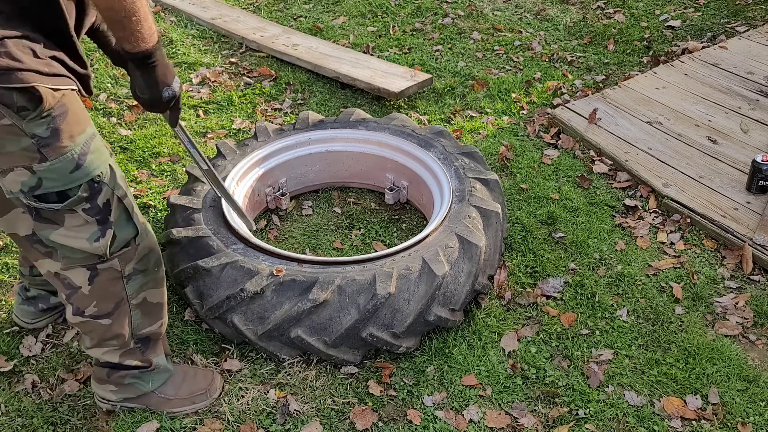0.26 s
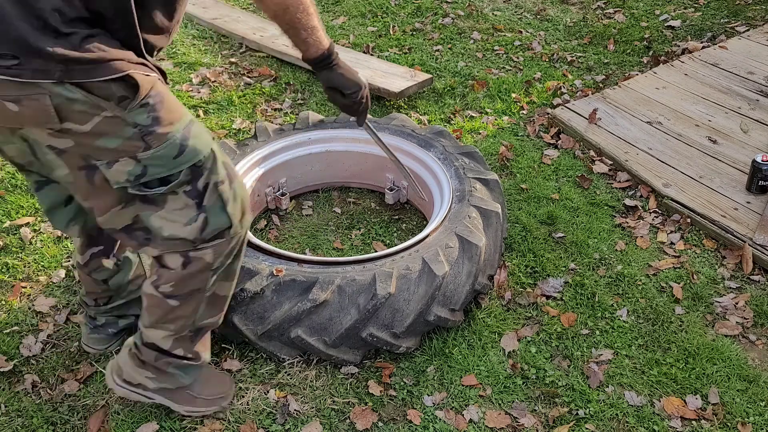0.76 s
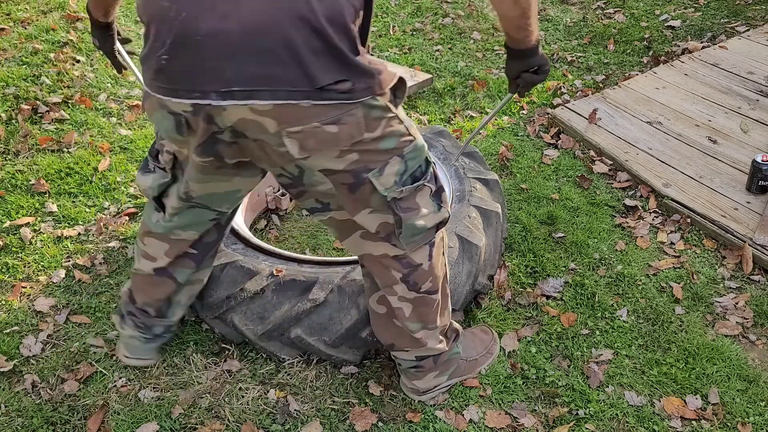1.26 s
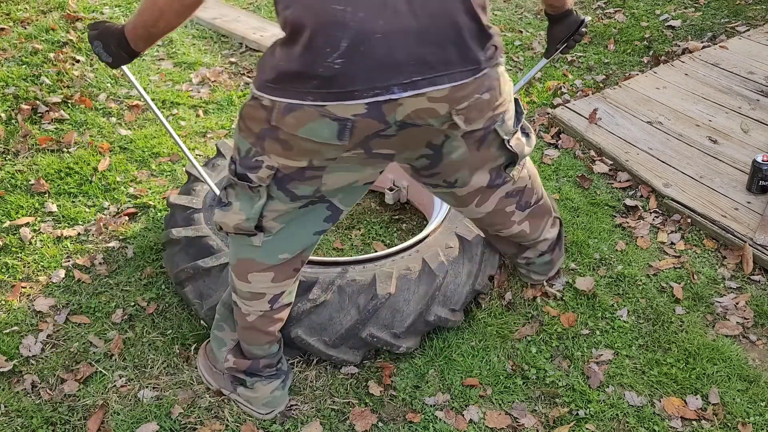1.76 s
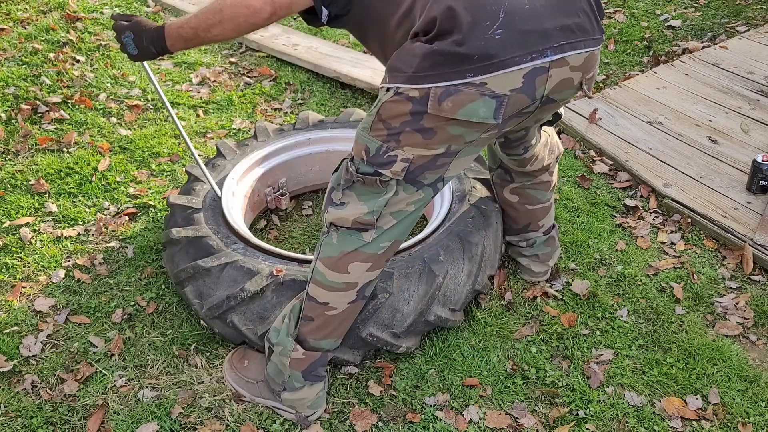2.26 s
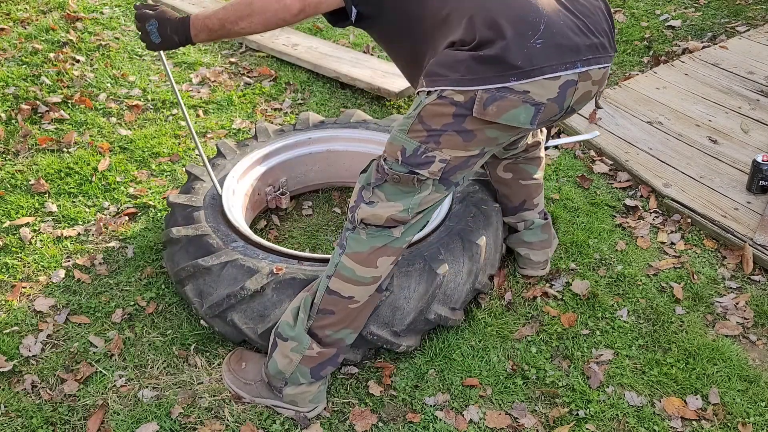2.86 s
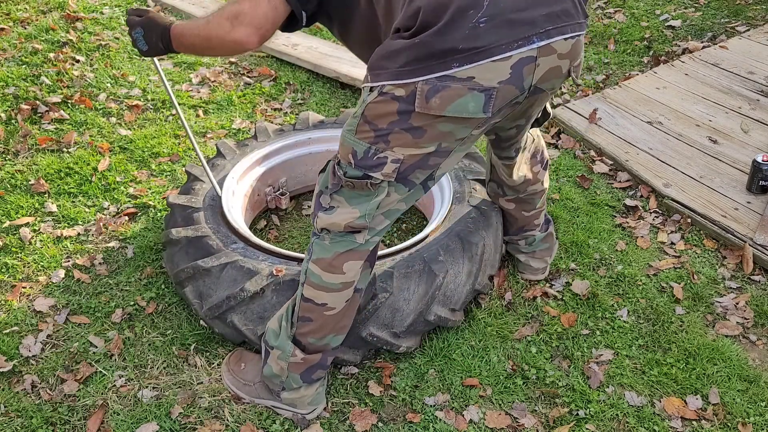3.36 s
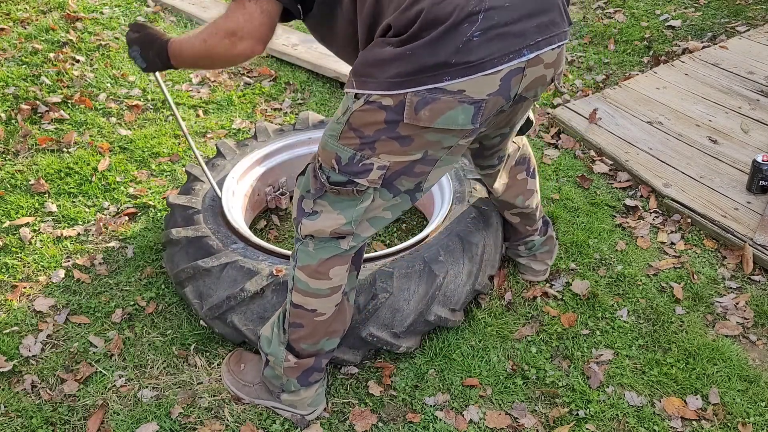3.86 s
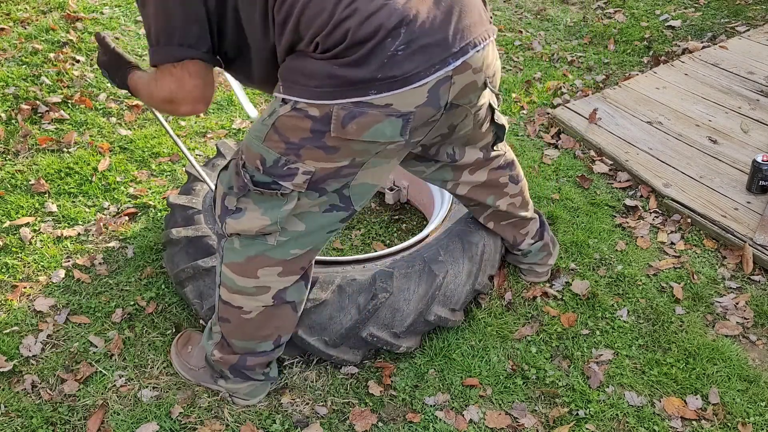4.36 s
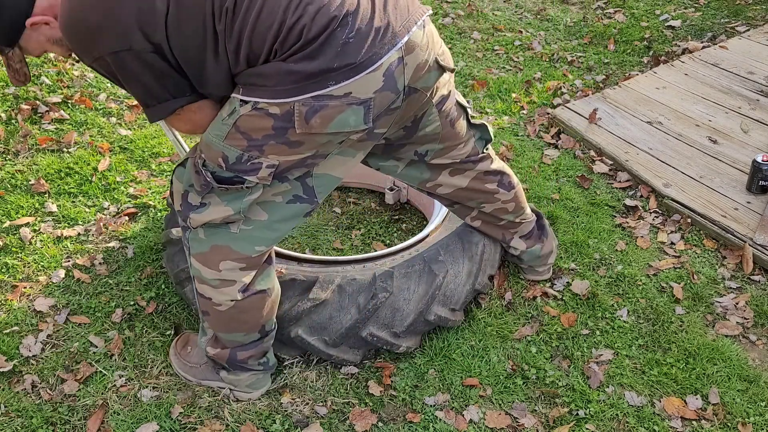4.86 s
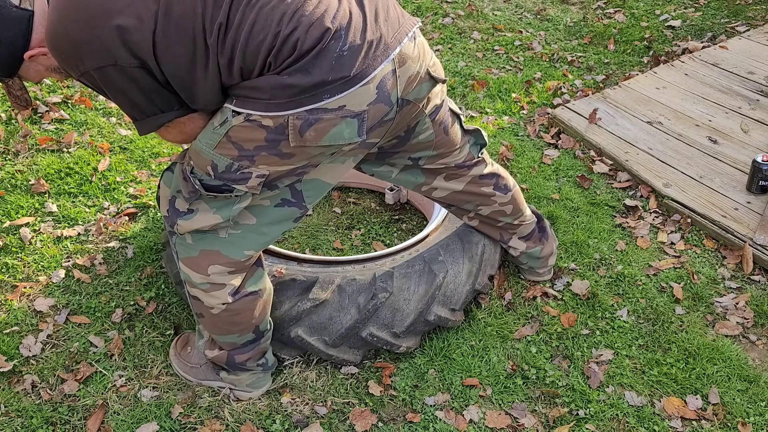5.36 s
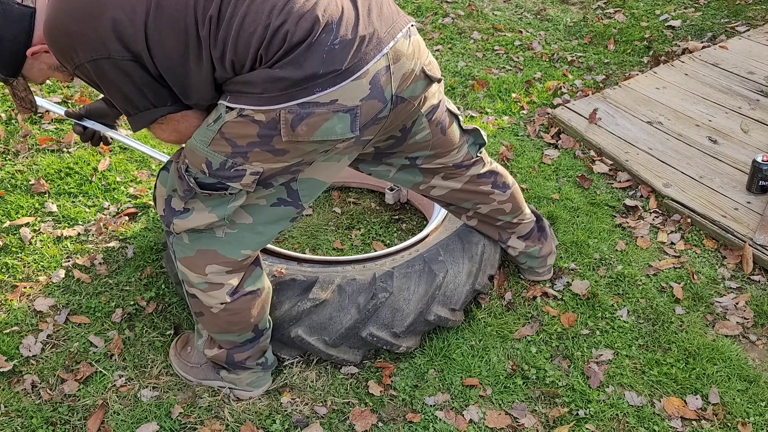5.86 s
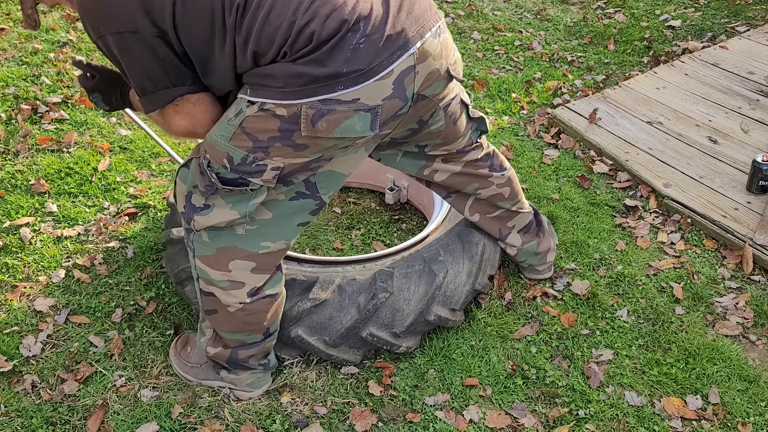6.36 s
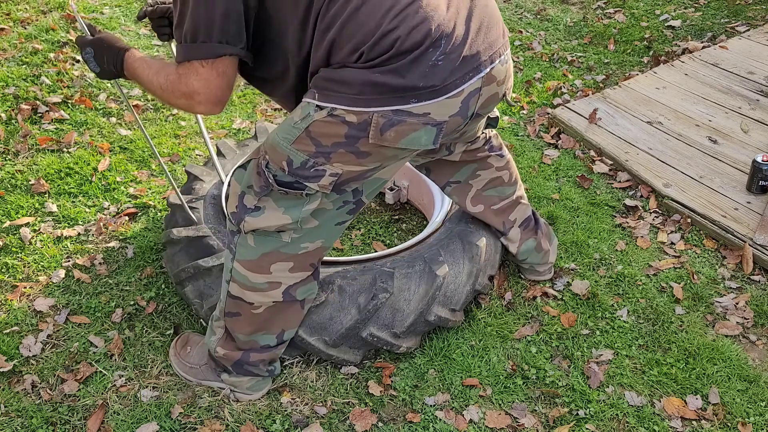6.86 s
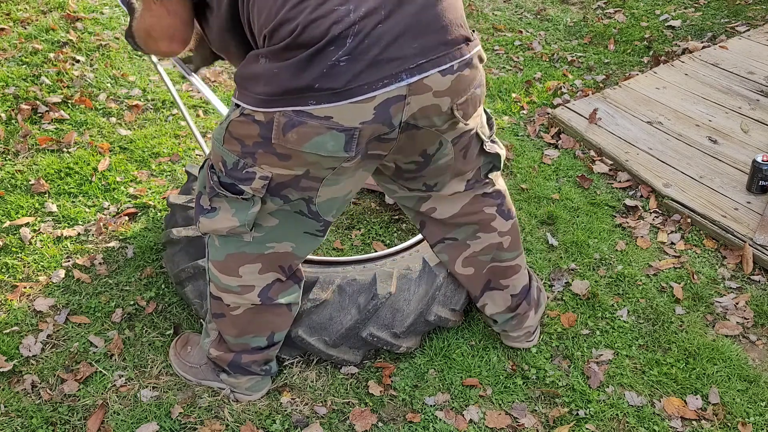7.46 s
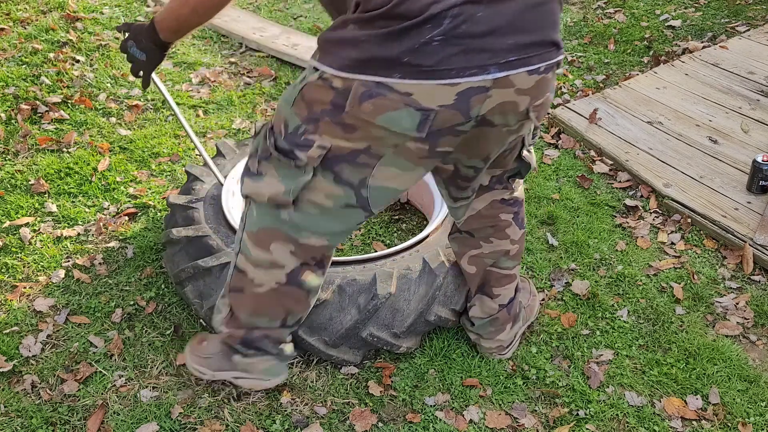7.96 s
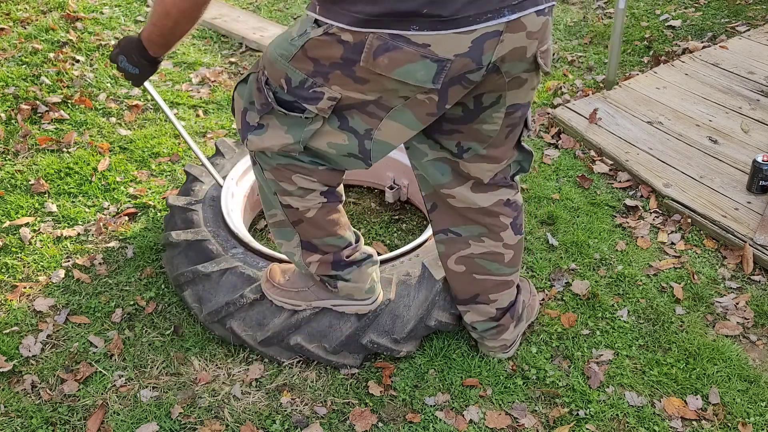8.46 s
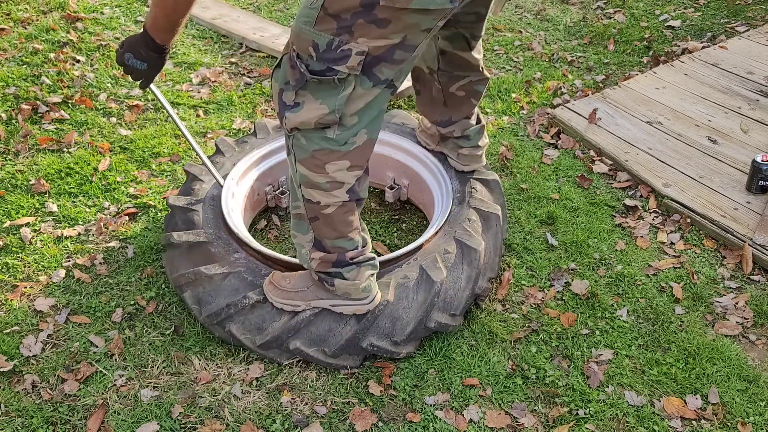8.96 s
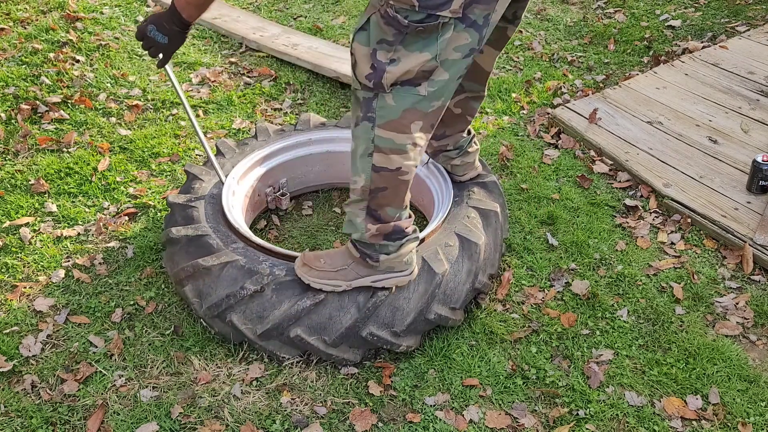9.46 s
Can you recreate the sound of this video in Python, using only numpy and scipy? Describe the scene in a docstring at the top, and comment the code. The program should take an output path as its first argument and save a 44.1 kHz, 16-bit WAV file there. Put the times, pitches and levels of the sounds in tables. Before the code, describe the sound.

Close outdoor sound of a tire being pried from a steel rim on a lawn. Grassy footsteps and snapping leaves lead to a bright clank, then light scraping and a busy burst of knocks with a loud low pop. Short damped clangs and rubbery pops continue, separated by quiet pauses. Late steps end in a booming thud and faint scuffs. A slight slapback follows, above a low, distant engine hum and faint air.

```python
"""A soft rubber pop and a thin, fading steel whine come first, then boots swishing through grass and leaves.
Two steel tire irons pry a tractor tire off its rim on a lawn: blows excite the damped modes of rim and iron,
stick-slip friction gives scrapes and whine, and the bead pops as decaying tones that fall in pitch.
Boots and tire thud at one low resonance; blades and leaves are filtered clicks and noise bursts.
A wall returns a short echo; a far engine, a few wavering sines, hums over the noise of open air."""
import sys
import numpy as np
from scipy import signal
from scipy.fft import rfft, irfft
from scipy.io import wavfile
from scipy.ndimage import uniform_filter1d

SR = 44100
rng = np.random.default_rng(int(sys.argv[2]) if len(sys.argv) > 2 else 0)


def to_wav(s):
    """Save 16-bit WAV."""
    ch = np.atleast_2d(s).T  # columns
    pcm = np.round(np.clip(ch, -1, 1) * 32767)  # PCM
    wavfile.write(sys.argv[1], SR, pcm.astype(np.int16))


N = 428211
T = np.arange(SR // 2) / SR  # time axis of one blow: half a second

# Throughout, pan_db is left minus right, and t60_s is the time to decay by 60 dB.
# Iron striking rim: start_s, level_db, lowest_hz and highest_hz driven by the contact, spot_m along the rim,
# bounce_ms, crack_db, pan_db, ring_length_factor (at least 0.2 is used), main_hz ringing hardest, lift_db
CLANKS = [(1.5395, -25, 635, 11800, 0.149, 1.59, -4.5, -2.5, 0.92, 3250, 3),
          (1.921, -41, 490, 3800, 0.535, 0.1, -1, -1, 0.94, 1490, 0),
          (2.349, -55.5, 243, 2270, 0.044, 0.2, -17.5, -12, 0.65, 1290, -1),
          (2.853, -59.5, 300, 2800, 0.0044, 0.2, 5, 0, 0.72, 1300, -2),
          (3.054, -54, 905, 7000, 0.072, 0.13, 2, 1, 1.6, 2885, 6),
          (3.086, -50, 243, 4000, 0.024, 0.16, 3, 1, 0.76, 750, 9),
          (3.130, -41, 245, 3820, 0.024, 0.15, 4, -0.5, 0.62, 760, 5),
          (3.153, -48, 245, 4500, 0.024, 0.14, 3, -1, 1.0, 2885, 14),
          (3.184, -50.5, 278, 5000, 0.0, 0.11, 1, 0, 1.4, 2830, 11),
          (3.239, -30.5, 750, 6200, 0.003, 0.55, -5.5, 0, 0.49, 1960, 11.5),
          (3.319, -30, 247, 12200, 0.006, 0.15, 0, -0.5, 0.59, 1560, 8),
          (3.384, -54.5, 300, 3520, 0.006, 0.1, -3, 2, 0.44, 2280, 28),
          (3.556, -49, 573, 4200, 0.071, 0.17, -12, 3, 1.24, 2260, 9),
          (3.586, -44.5, 704, 12000, 0.026, 0.45, 1, -1, 0.7, 2885, 9),
          (5.271, -31.5, 566, 4400, 0.017, 0.84, 2.5, -2, 1.1, 1300, 3.5),
          (5.366, -35.5, 586, 3400, 0.024, 1.77, 5.5, -2, 1.03, 1270, 9),
          (5.9, -31, 625, 5700, 0.752, 0.77, -9.5, -2.5, 1.2, 2556, 1.5),
          (5.926, -37.5, 520, 5270, 0.074, 0.15, 0, -3, 1.4, 1590, 17),
          (6.397, -36, 557, 5100, 0.012, 0.086, 4, -2, 1.6, 1180, 7),
          (6.434, -31, 550, 6500, 0.003, 0.094, 9.5, -2.5, 0.83, 1830, 13),
          (6.751, -29.5, 434, 4300, 0.008, 2.18, -0.5, -0.5, 0.48, 500, 5),
          (7.698, -44.5, 514, 4200, 0.025, 3.06, -1, 1, 1.24, 1530, 3),
          (7.746, -48.5, 453, 4500, 0.021, 0.15, 1, 3, 0.84, 713, -4),
          (7.761, -50, 500, 4500, 0.021, 0.074, 8, -3, 0.72, 1565, 4),
          (8.361, -40.5, 245, 6700, 0.028, 0.24, 5, 1.5, 0.18, 1200, -1),
          (9.090, -50, 292, 4300, 0.031, 0.21, 5, -4.5, 0.37, 765, 16)]
# Rim modes damped by the tire: pitch_hz, level_db, t60_s
RIM_MODES = [(383, 3.5, .06), (490, 4, .1), (593, -6, .067), (713, 0, .089), (800, -3, .06),
             (925, -15, .046), (1125, -2, .067), (1305, 9.5, .048), (1555, 4, .08), (1645, 5.5, .066),
             (1797, 2.5, .055), (1872, 6, .08), (2126, -5, .067), (2272, 3, .09), (2360, -3, .06),
             (2552, 0, .12), (2660, -8, .1), (2875, -1, .1), (3070, -2, .08), (3228, -1, .08),
             (3400, -7, .06), (3540, -8, .07), (4020, -5, .05), (4230, -13, .07), (4850, -9, .06),
             (5340, -8, .075), (5620, -12, .07), (6450, -11.5, .11), (7350, -16, .08)]
# Uneven radiation of the rim: pitch_hz, pan_db
RIM_AIM = [(400, 0.5), (700, 4.5), (1300, 2), (2000, 2), (4000, -1)]
# Spectrum of the crack of steel on steel: pitch_hz, level_db
CRACK_SPECTRUM = [(150, 13.5), (400, -1), (1500, -4), (3000, -0.6), (4500, -7.5), (6800, -5.5), (7800, -16),
                  (12000, -21.5), (16000, -25.5)]
# A loosely held iron ringing on: start_s, level_db, t60_factor, centre_hz, fall_db per octave
IRON_RINGS = [(1.546, -41, .5, 7000, -2), (3.06, -58, 0.47, 5000, -4), (3.18, -56, 0.43, 5500, -3),
              (3.59, -40, 0.39, 6500, 19), (5.273, -39.5, 1, 4870, 11), (5.575, -48.5, 0.42, 5324, 30),
              (5.904, -38, 0.43, 5040, 4), (6.436, -31, 0.24, 4800, 12), (7.645, -44, 0.85, 3800, 4.5),
              (7.664, -43, 0.53, 4460, 19)]
# Bending modes of an iron: pitch_hz, level_db, t60_s
IRON_MODES = [(1520, 1, .22), (2035, -5, .2), (2760, 3, .17), (3548, -4, .28), (4365, 2, .25),
              (4770, -3, .13), (5324, -5, .24), (6320, -8, .19), (7391, -9, .18), (8560, -14, .24)]
# Lip of the rim singing where the bead is off: start_s, level_db, t60_factor, centre_hz, fall_db per octave
LIP_RINGS = [(1.545, -23, 0.73, 2400, 10), (1.547, -39, .5, 5400, 6), (1.617, -39, 1.0, 2500, 20),
             (1.925, -61, 0.45, 2500, 20), (3.241, -36, 0.38, 2150, 32), (3.557, -42, 0.78, 2220, 30),
             (5.903, -32, .4, 2560, 37), (6.438, -42.5, 0.81, 2500, 16), (6.753, -37, 0.39, 2700, 40)]
# Modes of the lip: pitch_hz, level_db, t60_s
LIP_MODES = [(2266, 0, .24), (2552, 0, .24), (2869, -14, .21), (4888, -6, .15), (5335, -4, .19),
             (5626, -2, .17), (6756, -12, .2), (8861, -7, .17)]
# An iron dragged along the rim: start_s, end_s, level_db, centre_hz
SCRAPES = [(1.934, 1.974, -49, 2530), (3.037, 3.145, -55, 2740), (3.131, 3.192, -50, 2810),
           (3.457, 3.585, -57, 1610), (3.543, 3.597, -43, 2210), (3.964, 4.063, -61, 3040),
           (5.242, 5.294, -51, 3000), (5.539, 5.609, -62, 2600), (7.633, 7.69, -55.5, 4330),
           (7.695, 7.79, -56.5, 1900)]
# Curve of the whine of an iron sliding on the rim: time_s, pitch_hz, level_db
WHINE_CURVE = [(0, 1800, -52.5), (.13, 1811, -55.5), (.32, 1784, -59), (.55, 1766, -60.5), (.82, 1785, -74),
               (.97, 1780, -77)]
# Resonances of the whine: ratio to its pitch, width_hz, level_db
WHINE_MODES = [(1.0, 105, 1), (.91, 110, -7), (1.13, 160, -14), (.58, 160, -11), (.42, 200, -5.5)]
# Rubber bead slipping and popping: start_s, level_db, settled_hz, t60_s, snap_db
POPS = [(.005, -28, 255.5, 0.13, -3), (.304, -29.5, 199, 0.017, 1), (3.318, -10, 124, 0.082, -7),
        (3.324, -17.5, 172, 0.038, -24), (3.382, -19.5, 190, 0.05, -34), (4.783, -22.5, 78.4, 0.16, -3),
        (5.192, -24, 92, 0.11, -11), (5.709, -21.5, 121, 0.086, -7), (5.807, -30.5, 119, 0.041, -10),
        (5.878, -29, 92, 0.18, -26), (5.916, -22, 80.6, 0.18, -21), (8.36, -21.5, 336, 0.053, -7)]
# Boots or the levered wheel landing on tire or ground: start_s, level_db, t60_s, pan_db
THUDS = [(1.155, -25, 0.074, 0), (1.613, -16, 0.032, 10), (1.682, -29, 0.11, 15),
         (2.535, -36.5, 0.51, -14.5), (3.319, -17, 0.093, -1), (8.573, -22, 0.091, -2),
         (8.707, -10.5, 0.16, -2), (9.101, -27.5, 0.1, -1.5), (9.407, -28, 0.093, -2)]
# Boot sole scuffing on tread or ground: start_s, end_s, level_db, centre_hz, fall_db per octave
SCUFFS = [(1.431, 1.527, -49, 620, 6), (2.034, 2.127, -49, 3450, 9), (4.182, 4.216, -50, 2600, 11),
          (7.438, 7.504, -47, 2180, 9), (7.84, 7.92, -53.5, 3020, 19), (8.569, 8.613, -51.5, 378, 10),
          (8.709, 8.727, -34.5, 1650, 21), (8.73, 8.775, -61, 2020, 11), (8.849, 8.869, -55, 550, 15),
          (9.336, 9.52, -62.5, 1580, 10), (9.477, 9.569, -55, 3100, 22), (9.568, 9.604, -49, 3060, 16)]
# Sole squeaking as it turns on rubber: start_s, length_s, pitch_hz, level_db
SQUEAKS = [(8.8, .035, 1506, -60), (9.412, .045, 1563, -57.5)]
# Boot or trouser leg brushing through grass: middle_s, length_s, level_db, brightness_db
STRIDES = [(0.07, 0.23, -54.5, -8.5), (0.243, 0.14, -51.5, -4.5), (0.637, 0.098, -50.5, -5.5),
           (0.853, 0.069, -54, -3), (1.166, 0.02, -42.5, -2.5), (1.354, 0.12, -45.5, -1),
           (1.482, 0.12, -41, -8), (1.687, 0.11, -53, -6), (1.836, 0.073, -45.5, 0.5),
           (2.075, 0.077, -42, -7), (4.195, 0.1, -48.5, -7), (7.46, 0.068, -46.5, -4),
           (7.877, .12, -53, -5), (8.045, 0.055, -58.5, -6), (8.73, 0.066, -47, -10.5),
           (8.867, 0.022, -59.5, -5), (9.535, 0.11, -54.5, -8)]
# Spectrum of brushed grass: pitch_hz, level_db
GRASS_SPECTRUM = [(180, -4.5), (300, -5), (417, -5.5), (517, -2.5), (922, -11), (1590, -4.5), (2250, -5),
                  (6250, -1), (15000, -8)]
# Dry leaf or twig snapping underfoot: start_s, level_db (before its envelope)
SNAPS = [(0.653, -22), (0.8632, -35), (0.999, -46), (1.164, -29.5), (1.168, -54), (1.371, -32),
         (1.526, -32), (1.702, -48), (1.712, -46), (2.2593, -49.5), (4.332, -39), (4.494, -42.5),
         (4.517, -41), (6.936, -60), (7.354, -51), (7.423, -40)]
# Spectrum of a dry leaf: pitch_hz, level_db
LEAF_SPECTRUM = [(800, -28), (3000, -3), (6300, 19), (9000, 4), (15000, 8.5)]
# Lines of the distant engine: pitch_hz, level_db (rms, before the waver)
ENGINE_LINES = [(64.6, -67), (86, -57), (129.2, -60), (193.8, -61.5)]
# Spectrum of open air: pitch_hz, level_db
AIR_SPECTRUM = [(20, -14), (40, -8.5), (75, -0.5), (138, -9.5), (192, -11.5), (240, -19), (430, -29),
                (720, -25.5), (950, -33), (1500, -33.5), (3000, -42), (6500, -48.5), (9500, -57),
                (15500, -55.5)]

STRAIN = .003  # the strain of prying detunes the rim modes from blow to blow (share of pitch)
BEND_WAVE_M, NODE_DB = .24, -14  # rim's bending wavelength at 1 kHz; level of a mode struck on its node
LIFT_OCTAVES = 0.17  # how narrowly a blow favours one pitch
CARCASS_HZ = 69  # the whole tire bouncing on the lawn
SETTLE_DB, SETTLE_T60_S = -22, 2.9  # trodden grass springs back after each stride
LEAF_RATE_HZ, LEAF_DB = 20, -30.5  # small leaves crackle as it does
BLADE_SPREAD_DB = 2.8  # how unequal the ticks of single blades are
# Depth of each slow variation, in dB per unit of walk()
TUFT_DB, FLUTTER_DB, ENGINE_WAVER_DB = 1.3, 1.0, 1.6
AIR_DB = -50.2
TOP_HZ = 15450  # edge of the recorder's band


def clanks(crack_t60=0.09, crack_rise=0.0019, ring_rise=0.0013, bounce_db=-6.5, cut_hz=330):
    """Modal excitation: a skidding, once-bouncing blow drives modes by contact softness and by node position."""
    out = np.zeros((2, N))
    f = np.fft.rfftfreq(len(T), 1 / SR) + 1
    aim = pan(np.interp(f, *np.transpose(RIM_AIM)))
    for (start, db, low_hz, high_hz, spot, bounce_ms,
         crack_db, pan_db, length, main_hz, lift_db) in CLANKS:
        length = max(length, .2)
        crack = colour(rng.standard_normal((3, len(T))), CRACK_SPECTRUM)
        crack = crack * fade(crack_t60 * length, crack_rise)
        node_spectrum = np.transpose([f, node_db(f, spot)])
        crack = unit(colour(crack, node_spectrum) * fade(1, 1e-4))

        modes = []
        for hz, mode_db, t60 in RIM_MODES:
            strained_hz = hz * (1 + STRAIN * rng.standard_normal())
            lift = lift_db * np.exp(-(np.log2(hz / main_hz) / LIFT_OCTAVES) ** 2)
            modes.append((strained_hz, mode_db + node_db(hz, spot) + lift, t60))
        blow = unit(ring(modes, length, ring_rise, scatter_db=3.0)) + undb(crack_db) * crack

        # The bounce is a weaker, delayed copy: a phase shift in the spectrum
        bounce = 1 + undb(bounce_db) * np.exp(-2j * np.pi * f * bounce_ms / 1000)
        blow = ports(irfft(rfft(blow) * bounce, len(T)), apart=1.0, size=5)
        blow = cut(blow, low_hz, "high")
        blow = cut(blow, high_hz, "low")
        blow = cut(blow, cut_hz, "high", order=4)
        blow /= np.std(blow, axis=1, keepdims=True)  # equal in both ears before panning
        blow *= np.sqrt(SR / 20 / len(T))  # energy of the level held for a twentieth of a second
        aimed = irfft(rfft(blow) * aim, len(T))
        add(out, start, aimed * undb(db) * pan(pan_db))
    return out


def node_db(hz, spot):
    """Modal coupling: a blow near a node drives little; bending waves shorten with the root of pitch."""
    swing = abs(np.cos(2 * np.pi * spot / BEND_WAVE_M * np.sqrt(hz / 1000)))
    return 20 * np.log10(undb(NODE_DB) + (1 - undb(NODE_DB)) * swing)


def irons():
    """Free vibration: the free end of an iron rings in its bending modes after a blow."""
    return singing(IRON_RINGS, IRON_MODES, twin=0.0092, twin_db=-15.5, twin_length=1.0)


def lip():
    """Beating: the bare lip of the rim rings in rough pairs of close pitches."""
    return singing(LIP_RINGS, LIP_MODES, twin=0.0056, twin_db=-4, twin_length=0.81)


def singing(events, steel_modes, twin, twin_db, twin_length):
    """Selective excitation: steel that springs free sings on in the modes nearest the contact's pitch."""
    out = np.zeros((2, N))
    for start, db, length, centre_hz, fall_db in events:
        modes = []
        for hz, mode_db, t60 in steel_modes:
            octaves = abs(np.log2(hz / centre_hz))
            modes.append((hz, mode_db - fall_db * octaves, t60))
        # The steel bends in two planes, so each mode beats against a weaker twin
        modes += [(hz * (1 + twin), mode_db + twin_db, t60 * twin_length) for hz, mode_db, t60 in modes]
        sound = ring(modes, length, rise=0.0047, scatter_db=3.0)
        add(out, start, undb(db) * ports(sound, apart=0.52))
    return out


def scrapes(rate=420, grit_db=-7, focus_db=7, iron_db=-14):
    """Stick-slip friction: ticks of the dragged iron keep rim and iron ringing around the drag's own pitch."""
    out = np.zeros((2, N))
    for start, end, db, centre_hz in SCRAPES:
        slips, share = drag(start, end, rate, spread_db=-2.0)
        steel = unit(ring(RIM_MODES, 0.45, rise=0.00055, scatter_db=-1))
        steel += undb(iron_db) * unit(ring(IRON_MODES, 0.18, rise=0.00044, scatter_db=2))
        ringing = unit(signal.fftconvolve(slips, steel, axes=1)[:, :len(T)])
        grit = unit(colour(slips, CRACK_SPECTRUM))
        focus = [(centre_hz / 4, -2 * focus_db), (centre_hz, 0),
                 (centre_hz * 2, -focus_db), (centre_hz * 8, -4 * focus_db)]
        rasp = colour(ringing + undb(grit_db) * grit, focus)
        add(out, start, undb(db) * share * ports(unit(rasp), apart=0.35))
    return out


def whine():
    """Sustained friction: steady sliding holds a few narrow resonances that waver and fade."""
    t = np.arange(N) / SR
    times, pitch, db = np.transpose(WHINE_CURVE)
    phase = 2 * np.pi * np.cumsum(np.interp(t, times, pitch)) / SR
    level = undb(np.interp(t, times, db) + FLUTTER_DB * walk(30.3)) * (t < times[-1])
    out = np.zeros((3, N))
    for ratio, width_hz, mode_db in WHINE_MODES:
        # Slow noise on a cosine and a sine makes a narrow band around their pitch
        a, b = cut(rng.standard_normal((2, 3, N)), width_hz / 2, "low")
        out += undb(mode_db) * unit(a * np.cos(ratio * phase) + b * np.sin(ratio * phase))
    return ports(out * level, apart=0.74)


def tire(snap_hz=1000, settle_s=0.00305, rub_db=-20):
    """Dispersion: rubber's highs arrive first, so a pop falls in pitch; in a thud the whole carcass bounces."""
    out = np.zeros((2, N))
    rub_spectrum = [(40, -18.0), (150, 24), (700, -7), (1200, -28), (2500, -39), (8000, -50.0)]
    for start, db, hz, t60, snap_db in POPS:
        # The pitch starts snap_hz above its settled value
        cycles = hz * T + snap_hz * settle_s * (1 - np.exp(-T / settle_s))
        envelope = fade(t60, 0.014) + undb(snap_db) * fade(0.0061, 0.0012)
        pop = np.sin(2 * np.pi * cycles) * envelope
        rub = unit(colour(rng.standard_normal((3, len(T))), rub_spectrum))
        rub = ports(rub, apart=0.62) * fade(0.17, 0.00081)
        add(out, start, undb(db) * (pop + undb(rub_db) * rub))
    for start, db, t60, pan_db in THUDS:
        bounce = np.sin(2 * np.pi * CARCASS_HZ * T) * fade(t60, 0.0088)
        add(out, start, undb(db) * pan(pan_db) * bounce)
    return out


def boots(rate=1200, squeak_waver=.012):
    """Damped friction: rubber soles rasp in one broad, dead resonance and now and then squeak."""
    out = np.zeros((2, N))
    for start, end, db, centre_hz, fall_db in SCUFFS:
        slips, share = drag(start, end, rate, spread_db=1.5)
        resonance = [(centre_hz / 8, -3 * fall_db), (centre_hz, 0), (centre_hz * 8, -3 * fall_db)]
        rasp = unit(colour(slips, resonance))
        add(out, start, undb(db) * share * ports(rasp, apart=0.95))
    waver = 1 + squeak_waver * walk(140)[:len(T)]
    for start, length, hz, db in SQUEAKS:
        swell = np.sin(np.pi * np.minimum(T / length, 1))
        squeak = np.sin(2 * np.pi * np.cumsum(hz * waver) / SR)
        add(out, start, undb(db) * swell * squeak)
    return out


def drag(start, end, rate, spread_db):
    """Stick-slip: ticks swell and die between two times; the gain sets their level while they last."""
    n = int((end - start) * SR)
    swell = np.pad(signal.windows.tukey(n, .6), (0, len(T) - n))
    return grains(len(T), rate, spread_db) * swell, np.sqrt(n / len(T))


def grass(rate=12000, edge=5):
    """Superposed impacts: strides brush countless blades in uneven tufts; grass settles and leaves crackle."""
    out = np.zeros((2, N))
    tufts = undb(TUFT_DB * walk(90))
    t = np.arange(SR) / SR  # the second around a stride
    for middle, length, db, bright_db in STRIDES:
        start = max(middle - 2 * length, 0)
        since = start + t - middle
        swell = 1 / (1 + np.abs(2 * since / length) ** edge)
        settle = (since > 0) * undb(-60 * np.abs(since) / SETTLE_T60_S)
        brush = colour(grains(SR, rate, BLADE_SPREAD_DB), GRASS_SPECTRUM)
        brush = unit(colour(brush, [(1000, -bright_db), (8000, bright_db)]))
        leaves = unit(colour(grains(SR, LEAF_RATE_HZ, 5.9), LEAF_SPECTRUM))
        sound = brush * (swell + undb(SETTLE_DB) * settle) + undb(LEAF_DB) * leaves * settle
        add(out, start, undb(db) * ports(sound, apart=0.54))
    out *= tufts
    for start, db in SNAPS:
        snap = unit(colour(rng.standard_normal((3, len(T))), LEAF_SPECTRUM)) * fade(0.012, 0.00056)
        add(out, start, undb(db) * ports(snap, apart=0.2))
    return out


def yard(x, echo_s=0.019, echo_db=-14, scatter_db=-15, tail_db=-25, tail_t60=0.3):
    """Reflection: a slap from the wall, scatter from the deck just behind it, and a faint outdoor tail."""
    noise = rng.standard_normal((2, 2, len(T)))
    noise = colour(noise, [(100, -19.5), (600, -18.0), (3000, -14.0), (12000, -15.0)])
    # A click dying within a few samples dulls the slap; .63 makes its samples sum to about one
    slap = undb(echo_db) * np.exp(-np.arange(len(T))) * .63
    scatter = undb(scatter_db) * unit(noise[0] * fade(0.045, 0.00022)) / np.sqrt(len(T))
    tail = undb(tail_db) * unit(noise[1] * fade(tail_t60, 0.046)) / np.sqrt(len(T))
    response = np.roll(slap + scatter, int(echo_s * SR), axis=1) + tail
    return x + signal.fftconvolve(x, response, axes=1)[:, :N]


def distance(wander_cycles=0.27):
    """Periodic and random sound: a far engine's lines waver over the low rumble and faint hiss of open air."""
    mid, side = colour(rng.standard_normal((2, N)), AIR_SPECTRUM)
    side = colour(side, [(25, -13), (70, -7.0), (150, -22.0), (400, 4.5), (1500, 2.5)])
    air = (mid + side * np.array([[1], [-1]])) / mid.std()
    air = air * undb(AIR_DB + .5 * walk(2.2))
    t = np.arange(N) / SR
    hum = np.zeros(N)
    for hz, db in ENGINE_LINES:
        level = np.sqrt(2) * undb(db + ENGINE_WAVER_DB * walk(6.2))
        hum += level * np.sin(2 * np.pi * (hz * t + wander_cycles * walk(6)))
    return air + hum


def ring(modes, length, rise, scatter_db=7.0):
    """Modal synthesis: damped sines along three paths; every blow meets them a little differently."""
    out = np.zeros((3, len(T)))
    for hz, db, t60 in modes:
        size, pitch = rng.standard_normal((2, 3, 1))
        phase = 2 * np.pi * (hz * (1 + .002 * pitch) * T + rng.random((3, 1)))
        level = undb(db + scatter_db * size)
        out += level * np.sin(phase.astype(np.float32)) * fade(t60 * length, rise)
    return out


def grains(n, rate, spread_db):
    """Random impulses: tiny clicks of unequal size, at a mean rate per second, along three paths."""
    struck = rng.random(n) < rate / SR
    size = struck * undb(spread_db * np.minimum(rng.exponential(size=n), 4))
    return unit(size * rng.standard_normal((3, n)))


def fade(t60, rise):
    """Exponential damping: a quick rise, then a decay by 60 dB in t60 seconds."""
    return (1 - np.exp(-T / rise)) * np.exp(-np.log(1000) * T / t60)


def walk(rate):
    """Slow random variation: random levels joined by straight lines, about 1.3 rms."""
    k = int(SR / rate)
    steps = np.repeat(rng.standard_normal(N // k + 1), k)
    return 1.57 * uniform_filter1d(steps, k)[:N]


def ports(x, apart, size=8):
    """Binaural delay: one shared path, up to `size` samples earlier on the left, and one path for each ear."""
    lag = rng.integers(1, size + 1)
    shared = np.stack([x[0], np.pad(x[0], (lag, 0))[:-lag]])
    return (shared + apart * x[1:]) / np.hypot(1, apart)


def pan(db):
    """Interaural level difference: gains of the two ears, left minus right in dB."""
    return undb(np.array([[.5], [-.5]]) * db)


def colour(x, points):
    """Spectral shaping: filter by (Hz, dB) points, joined along log frequency."""
    hz, db = np.transpose(points)
    f = np.fft.rfftfreq(x.shape[-1], 1 / SR) + 1
    gain = undb(np.interp(np.log(f), np.log(hz), db))
    return irfft(rfft(x) * gain, x.shape[-1])


def cut(x, hz, kind, order=3):
    """Band limiting: a Butterworth high-pass or low-pass."""
    return signal.sosfilt(signal.butter(order, hz, kind, fs=SR, output="sos"), x)


def undb(db):
    """Level to amplitude: decibels become gain."""
    return 10 ** (np.asarray(db) / 20)


def unit(x):
    """Normalisation: scale to rms 1."""
    return x / np.sqrt(np.mean(x ** 2))


def add(out, start, x):
    """Superposition: mix x into out from the start time in seconds."""
    i = max(int(start * SR), 0)
    out[:, i:i + x.shape[-1]] += x[..., :N - i]


def scene():
    """Superposition: the work on the wheel with the yard's reflections, over the distant hum and air."""
    steel = clanks() + irons() + lip() + scrapes() + whine()
    work = steel + tire() + boots() + grass()
    return yard(work) + distance()


def record(dry):
    """Band limit: the recorder cuts the top with a steep elliptic low-pass."""
    return signal.sosfilt(signal.ellip(8, .2, 70, TOP_HZ, fs=SR, output="sos"), dry)


dry = scene()
out = record(dry)
to_wav(out)
```